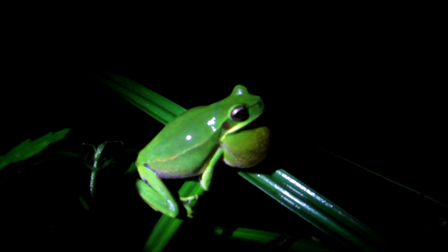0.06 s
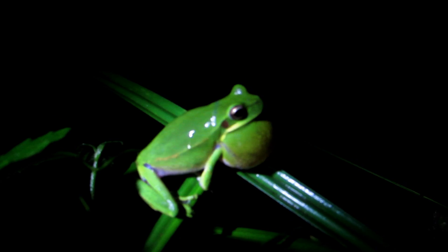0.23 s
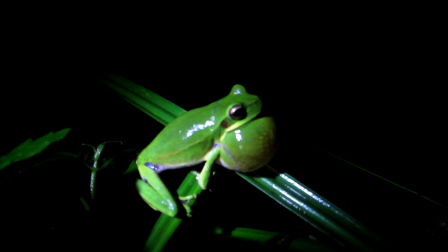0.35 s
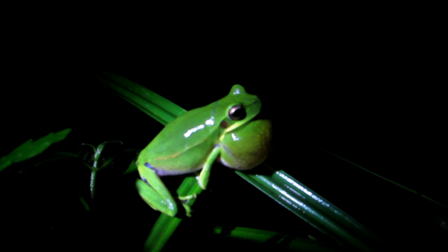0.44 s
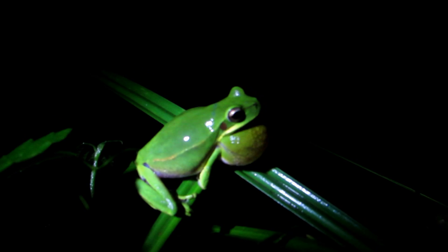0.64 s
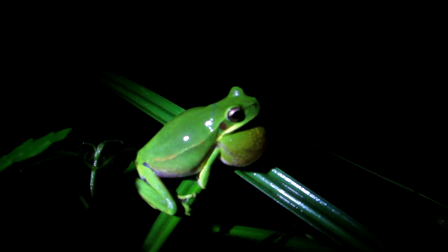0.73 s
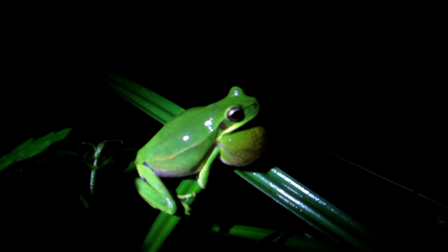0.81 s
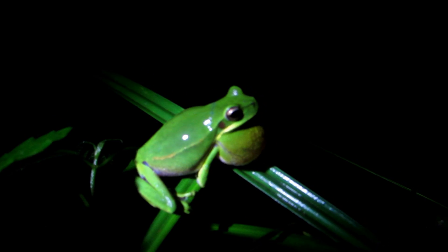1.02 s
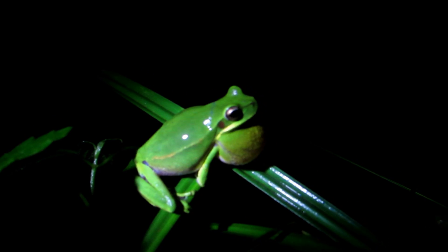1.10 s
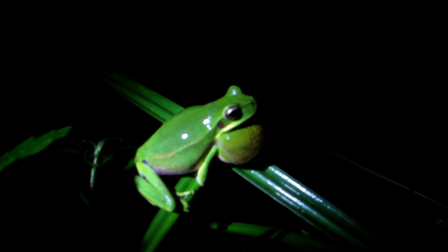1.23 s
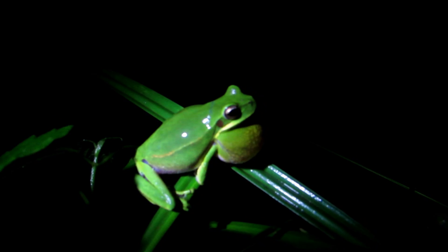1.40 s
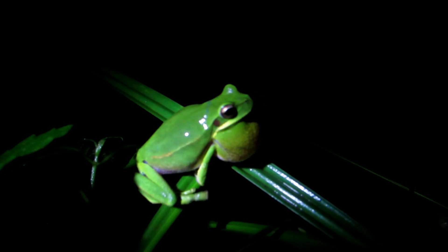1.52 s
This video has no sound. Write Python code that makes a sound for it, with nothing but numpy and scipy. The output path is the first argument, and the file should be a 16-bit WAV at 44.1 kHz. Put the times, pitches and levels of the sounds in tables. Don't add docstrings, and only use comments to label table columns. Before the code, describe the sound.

A tree frog calls close and almost centred: faint night hiss and distant frogs first, then four loud, hard, pulsed croaks from 0.21 to 0.35 seconds and a buzzing note at 0.39-0.45 that rises and falls. Softer neighbours answer left and right, busiest at 0.7-0.96 and 1.2-1.45. Thin crickets pulse from 0.6, leaves tick, and the background slowly swells until 1.55.

```python
import sys
import numpy as np
from scipy import signal
from scipy.fft import rfft, irfft, next_fast_len
from scipy.io import wavfile
from scipy.ndimage import map_coordinates

SR = 44100
rng = np.random.default_rng(int(sys.argv[2]) if len(sys.argv) > 2 else 0)


def makeup_ratio(level_db):
    decades = np.asarray(level_db, float) / 20
    return 10 ** decades


def transcribe(signal):
    frames = np.atleast_2d(signal).T
    limited = np.clip(frames, -1, 1)
    pcm = np.round(limited * 32767).astype(np.int16)
    wavfile.write(sys.argv[1], SR, pcm)


N = 68355


def unit(x):
    return x / np.sqrt(np.mean(x ** 2) + 1e-20)


def along(points, hz):
    f, v = np.transpose(points)
    return np.interp(np.log(hz + 1), np.log(f + 1), v)


def wobble(rate):
    return map_coordinates(rng.standard_normal(400), [np.arange(N) * rate / SR % 390])


def filtered(x, response):
    m = next_fast_len(N + SR // 2)
    return irfft(rfft(x, m) * response(np.fft.rfftfreq(m, 1 / SR)), m)[..., :N]


def band(hz, width):
    return unit(filtered(rng.standard_normal(N), lambda f: np.exp(-((f - hz) / width) ** 2)))


def night_air():
    # frequency in Hz, level in dB per Hz.
    spectrum = [(15, -60), (25, -21.5), (258, -19.5), (417, -13.5), (2080, -13), (2380, -16), (2650, -15),
                (11300, -24.5), (15200, -29)]
    # frequency in Hz, left-right likeness (0-1).
    likeness = [(30, 0.27), (150, 0.15), (500, 0.35), (2000, 0.17), (5000, 0.45), (9000, 0.029)]

    def spread(hz):
        angle = np.arccos(np.clip(along(likeness, hz), -1, 1)) / 2
        return makeup_ratio(along(spectrum, hz)) * [np.cos(angle), np.sin(angle)]

    mid, side = filtered(rng.standard_normal((2, N)), spread)
    return unit(np.array([mid + side, mid - side])) * makeup_ratio(-46.0 + 1.3 * wobble(19.86))


def far_chorus():
    swell_db = 3
    chorus = np.zeros(N)
    for hz, db in [(1150, -58.5), (1500, -53.5), (1850, -66), (2300, -65.5)]:
        swell = swell_db * (wobble(33.63) + wobble(150))
        chorus += band(hz, 130) * makeup_ratio(db + swell)
    return chorus


def insects():
    # start in seconds, length in seconds, level in dB.
    bouts = [
        (0.62, 0.375, -52),
        (1.143, .45, -50),
    ]
    cricket_hz, strokes_hz, katydid_hz = 5262, 35.7, 4950
    t = np.arange(N) / SR
    strokes = (.5 + .5 * np.sin(2 * np.pi * strokes_hz * t + 0.18 * wobble(2.6))) ** 0.69
    level = sum(makeup_ratio(db) * np.clip(np.minimum(t - s, s + length - t) / 0.018, 0, 1)
                for s, length, db in bouts)
    tone = np.sin(2 * np.pi * cricket_hz * t + 0.75 * wobble(40.07))
    cricket = makeup_ratio(2.4 * wobble(9.47)) * level * strokes * tone
    katydid = makeup_ratio(-56.5 + 0.59 * wobble(60)) * band(katydid_hz, 420)
    return cricket + katydid


def night():
    # time in seconds, background level in dB.
    gain = [(0.0, -52.5), (0.266, -51.5), (0.393, -57), (0.685, -54), (0.948, -49.5), (1.39, -47.5),
            (1.55, -46.5)]
    s, db = np.transpose(gain)
    return (night_air() + far_chorus() + insects()) * makeup_ratio(np.interp(np.arange(N) / SR, s, db - db.mean()))


def leaves():
    # time in seconds, level in dB, length in seconds.
    ticks = [
        (.395, -50, .0015),
        (.705, -51, .002),
        (1.209, -50, .002),
        (1.245, -41, .0035),
        (1.40, -50, .006),
        (1.493, -43, .002),
        (1.547, -44, .003),
    ]
    t = np.arange(N) / SR
    shape = sum(makeup_ratio(db) * np.exp(-((t - s) / length) ** 2) for s, db, length in ticks)
    tilt = [(300, -26.0), (2500, 14.5), (14000, 3)]  # Hz, dB
    return filtered(shape * rng.standard_normal((2, N)), lambda f: makeup_ratio(along(tilt, f)))


def bushes(x, t60):
    t = np.arange(SR // 3) / SR
    tail = rng.standard_normal((2, len(t))) * makeup_ratio(-60 * t / t60) * (t > .003)
    return signal.fftconvolve(x[None], tail / np.linalg.norm(tail[0]), axes=1)[:, :N]


def radiated(x):
    return signal.sosfilt(signal.butter(4, 920, "high", fs=SR, output="sos"), x)


def add(out, times, levels_db, modes, rise=.00035):
    at = np.floor(times * SR)[:, None] + np.arange(2048)
    t = np.maximum(at / SR - times[:, None], 0)
    ring = np.zeros(at.shape)
    for k, (hz, db, t60) in enumerate(modes):
        ring += (-1) ** k * makeup_ratio(db - 60 * t / abs(t60)) * np.sin(2 * np.pi * hz * t)
    ring = ring * (1 - np.exp(-(t / rise) ** 2)) * makeup_ratio(levels_db)[:, None]
    out += np.bincount(at.astype(int).ravel(), ring.ravel(), N + SR)[:N]


def neighbour(calls, low, low_db, high_db, t60, fade_db, jitter):
    first_db, uneven_db = 2.5, 1.6
    stop_db_per_s = 8000
    out, k = np.zeros(N), np.arange(28)
    chance = rng.standard_normal((len(calls), 2, len(k)))
    for (s, length, db, hz, rate_hz), (shift, size) in zip(calls, chance):
        t = (k * round(hz / rate_hz) + jitter * shift * (k > 0)) / hz
        level_db = db - fade_db * t / length - stop_db_per_s * np.maximum(t - length, 0)
        level_db = level_db + np.where(k > 0, uneven_db * size, first_db)
        sac = [(hz * low, low_db, t60), (hz, 0, t60), (hz * 1.222, -14, .012)]
        throat = [(2900, high_db, .008), (3550, high_db, .008)]
        add(out, np.maximum(s + t, 0), level_db, sac + throat, rise=0.00036)
    return radiated(out)


def neighbours():
    # start in seconds, length in seconds, level in dB, sac in Hz, pulse rate in Hz.
    right_calls = [(.458, 0.014, -26.5, 1823, 300), (.676, 0.02, -34.5, 1986, 314.5),
                   (.709, 0.054, -27, 2040, 295), (.720, 0.0058, -30, 1674, 297),
                   (.736, 0.011, -21.5, 1866, 280), (.748, 0.035, -25, 1575, 170),
                   (.775, 0.017, -27.5, 2170, 200), (.796, 0.032, -22.5, 2127, 260),
                   (.810, 0.006, -24, 1746, 200), (.819, 0.019, -18.5, 1633, 280),
                   (.841, 0.009, -18, 1735, 290), (.900, 0.014, -17.5, 1645, 270),
                   (.917, .02, -21, 1680, 240)]
    left_calls = [(0, 0.065, -40.5, 1836, 297), (.195, 0.026, -25.5, 1503, 200),
                  (.283, 0.0052, -30, 1480, 245), (.312, 0.019, -34.5, 1532, 300),
                  (.365, 0.01, -27.5, 1750, 290), (.381, 0.017, -32, 1790, 300),
                  (1.04, 0.15, -43, 1337, 63), (.567, 0.0039, -30, 1090, 270), (.64, 0.026, -38, 1068, 280),
                  (.701, 0.069, -32.5, 1611, 294), (1.13, 0.047, -69, 1440, 59.6),
                  (1.237, 0.012, -28.5, 1206, 300), (1.25, 0.0085, -34, 1194, 200),
                  (1.308, 0.015, -26, 1176, 270), (1.395, 0.021, -22, 1750, 267)]
    high_calls = [(.025, 0.084, -45.5, 2320, 338), (.10, 0.08, -49, 2305, 339),
                  (.855, 0.005, -18, 2300, 330), (.864, 0.019, -20.5, 2327, 220),
                  (.878, 0.013, -17, 2254, 250), (.927, .004, -29, 2290, 300),
                  (.941, 0.0056, -18, 2370, 331.4), (.954, 0.017, -22.5, 2291, 300),
                  (1.0, 0.041, -38.5, 2317, 322), (1.16, 0.22, -43, 2344, 331),
                  (1.24, 0.071, -41, 2350, 322)]
    bright_calls = [
        (.639, 0.034, -25.5, 1823, 303.7),
        (.720, 0.069, -25, 1762, 300),
        (.796, 0.081, -27, 1702, 300),
        (.852, 0.051, -24, 1887, 310),
        (.937, 0.059, -29.5, 1944, 310),
        (1.396, 0.027, -25, 1744, 200),
    ]
    smooth_calls = [
        (.5285, 0.027, -22.5, 1772, 256),
        (.566, 0.025, -31, 1797, 270),
        (.598, 0.0307, -37.5, 1840, 100.7),
    ]
    late_calls = [(1.198, 0.0057, -21.5, 1645, 260), (1.208, 0.0058, -25, 1753, 250),
                  (1.219, 0.0056, -23, 1510, 150), (1.236, 0.018, -31, 1640, 200),
                  (1.268, 0.025, -16.5, 1666, 280), (1.288, 0.016, -21.5, 1660, 210),
                  (1.308, 0.021, -22.5, 1550, 220), (1.348, 0.0079, -16.5, 1666, 240),
                  (1.3545, 0.0074, -23, 1701, 340), (1.367, 0.0044, -18, 1730, 280),
                  (1.374, 0.035, -28.5, 1806, 300), (1.43, 0.086, -32.5, 1800, 140),
                  (1.475, 0.011, -34, 1970, 200)]
    pure_calls = [
        (.922, 0.021, -29, 1266, 320),
        (1.322, 0.015, -24.5, 1690, 340),
        (1.378, .014, -28, 1233, 300),
        (1.41, 0.025, -28.5, 1195, 298),
    ]
    right = neighbour(right_calls, low=.77, low_db=-5, high_db=-22, t60=.021, fade_db=5, jitter=.18)
    left = neighbour(left_calls, low=.7, low_db=-10, high_db=-20, t60=.026, fade_db=5, jitter=.13)
    high = neighbour(high_calls, low=.83, low_db=-7, high_db=-24, t60=.021, fade_db=5, jitter=.17)
    bright = neighbour(bright_calls, low=.646, low_db=-4.5, high_db=-12, t60=.016, fade_db=3, jitter=.41)
    smooth = neighbour(smooth_calls, low=.59, low_db=-10, high_db=-32, t60=.028, fade_db=6, jitter=.08)
    late = neighbour(late_calls, low=.77, low_db=-5, high_db=-21, t60=.023, fade_db=4, jitter=.15)
    pure = neighbour(pure_calls, low=.8, low_db=-24, high_db=-32, t60=.03, fade_db=3, jitter=.05)
    frogs = np.array([right, left, high, bright, smooth, late, pure])
    pan_db = np.array([-3.5, 1.5, -1.6, 1.7, -1.5, -1.5, -0.2])
    echo_db = -11
    return makeup_ratio([pan_db, -pan_db]) @ frogs + makeup_ratio(echo_db) * bushes(frogs.sum(0), t60=.14)


def near_voice(tune, damp, climb):
    # frequency in Hz, level in dB, t60 in seconds.
    sac_modes = [(1048, -8, .026), (1728, -1.5, 0.017), (2640, -35, 0.014), (3270, -27.5, 0.0082),
                 (3940, -21.5, 0.0027)]
    # frequency in Hz, level in dB, t60 in seconds.
    snap_modes = [(5150, -23, 0.002), (6650, -37, .003), (7050, -28, 0.005), (7500, -36, .003),
                  (11000, -37.5, 0.0026)]
    sac = [(f * tune ** min(k, 1), g, d / damp) for k, (f, g, d) in enumerate(sac_modes)]
    return sac, [(f * climb, g, d) for f, g, d in snap_modes]


def croaks(out):
    # start in seconds, first pulse in dB, pulse rate in Hz, sac tuning ratio.
    calls = [
        (.2139, 1.5, 234.6, 0.95),
        (.2503, 2.03, 229, 0.94),
        (0.2929, 0, 250.3, 0.97),
        (.3380, 0.5, 251.4, 0.99),
    ]
    pulses = [2, 3, 3, 4]
    # snap tuning ratio, snap gain in dB.
    effort = [(.89, -5), (.97, -3), (1.005, 0), (1.025, 0)]
    first_db, fade_db = 2.5, 0.5
    shy_db = 9
    for (s, db, rate_hz, tune), count, (climb, snap_db) in zip(calls, pulses, effort):
        k = np.arange(count)
        times = s + k * (1 + .0006 * k ** 5) / rate_hz
        level_db = db - first_db * (k > 0) - fade_db * k
        sac, snap = near_voice(tune, 0.99, climb)
        add(out, times, level_db, sac)
        add(out, times, level_db + snap_db - shy_db * (k == 0), snap)
    return [c[0] for c in calls]


def long_note(out):
    # time in seconds, pulse rate in Hz, level in dB, lowest mode's gain in dB.
    glide = [
        (0.3947, 290, 2, -7),
        (0.398, 325, 1, -9),
        (0.412, 337.2, -4.5, -6),
        (0.42, 351.5, -11.5, 1),
        (0.433, 326.4, -6, -7),
        (0.443, 288, -14, 5),
        (0.446, 242, -16, -8.5),
        (0.4538, 227, -18, 15.5),
    ]
    snap_db, shy_db = -5, 9
    s, rate_hz, db, low_db = np.transpose(glide)
    t = np.linspace(s[0], s[-1], 2000)
    cycles = np.cumsum(np.interp(t, s, rate_hz)) * (t[1] - t[0])
    times = np.interp(np.arange(int(cycles[-1]) + 1), cycles, t)
    level_db = np.interp(times, s, db) + .6 * rng.standard_normal(40)[:len(times)]
    sac, snap = near_voice(1.015, 1.08, 1.01)
    add(out, times, level_db + np.interp(times, s, low_db), sac[:1])
    add(out, times, level_db, [(1, -200, 1)] + sac[1:])
    uneven_db = 4 * rng.standard_normal(40)[:len(times)]
    add(out, times, level_db + snap_db + uneven_db - shy_db * (times == times[0]), snap)
    return s[0]


def near_frog():
    # frequency in Hz, level in dB, t60 in seconds.
    pop_modes = [(300, -36.5, 0.0054), (550, -34.5, 0.011)]
    puff_db, puff_s = -48, 0.0013
    out, pop = np.zeros(N), np.zeros(N)
    starts = np.array(croaks(out) + [long_note(out)])
    add(pop, starts, 0 * starts, pop_modes)
    u = np.maximum(np.arange(N) / SR - starts[:, None], 0) / puff_s
    puff = makeup_ratio(puff_db) * (u * np.exp(-u)).sum(0)
    return puff + pop - radiated(out)


def scene():
    near = near_frog()
    near_echo_db = -19
    direct = near * makeup_ratio([[.2], [-.2]])
    echoes = makeup_ratio(near_echo_db) * bushes(near, t60=.06)
    return direct + echoes + neighbours() + night() + leaves()


def top_cut(x):
    return signal.sosfilt(signal.butter(12, 15310, fs=SR, output="sos"), x)


def record(dry):
    # frequency in Hz, width in Hz, depth (0-1).
    notches = [(825, 110, 0.33), (3940, 400, 0.61), (8140, 230, 0.43)]
    top_hz, roll_hz = 14800, 14500

    def colour(f):
        response = (f < top_hz) / (1 + (f / roll_hz) ** 24)
        for hz, width, depth in notches:
            response = response * (1 - np.clip(depth, 0, 1) * np.exp(-((f - hz) / width) ** 2))
        return response

    return top_cut(np.clip(filtered(dry, colour), -1, 1))


dry = scene()
out = record(dry)
transcribe(out)
```